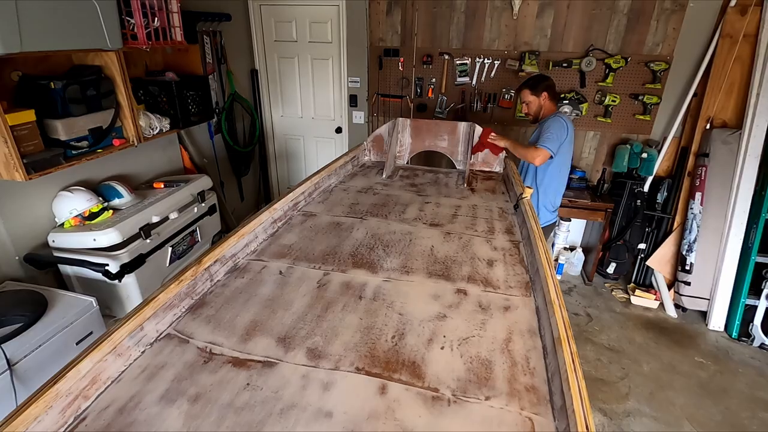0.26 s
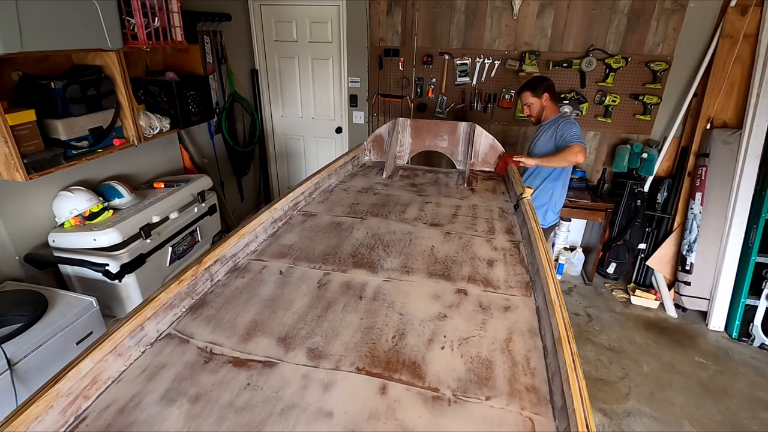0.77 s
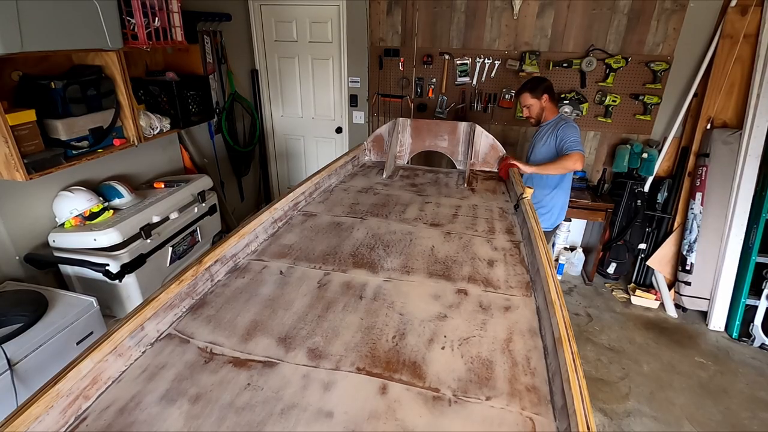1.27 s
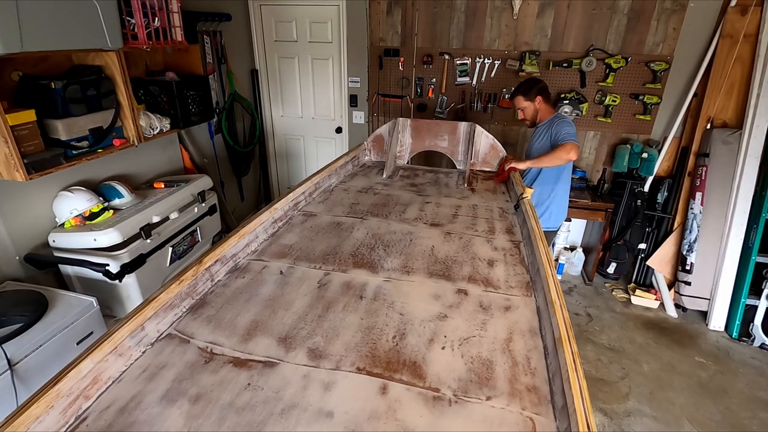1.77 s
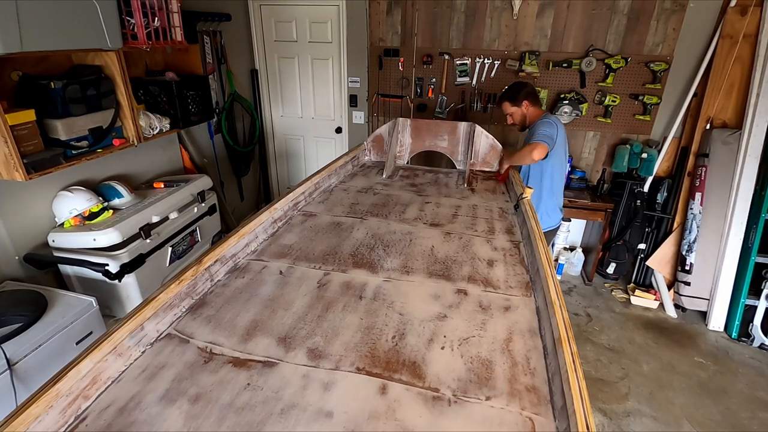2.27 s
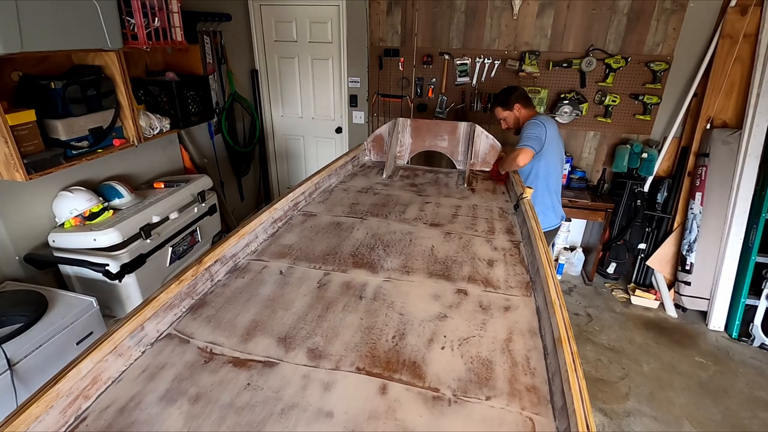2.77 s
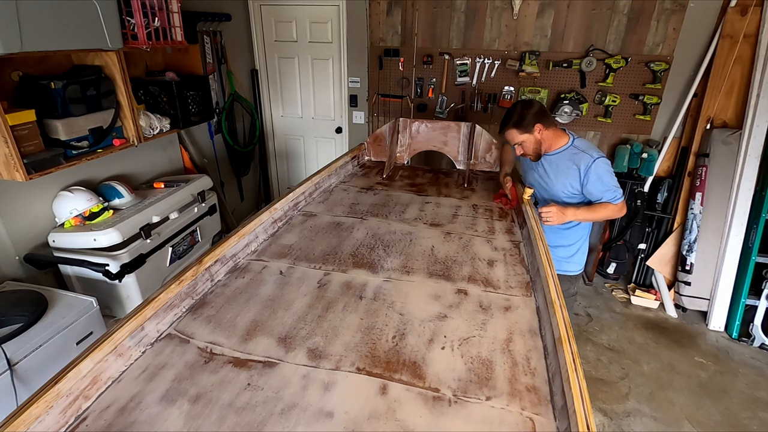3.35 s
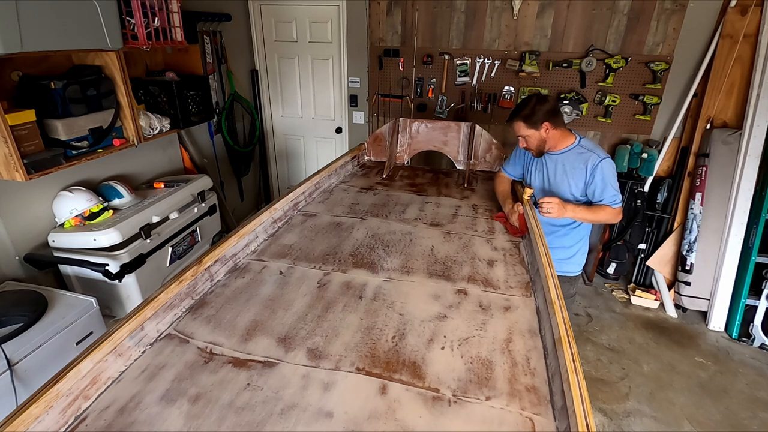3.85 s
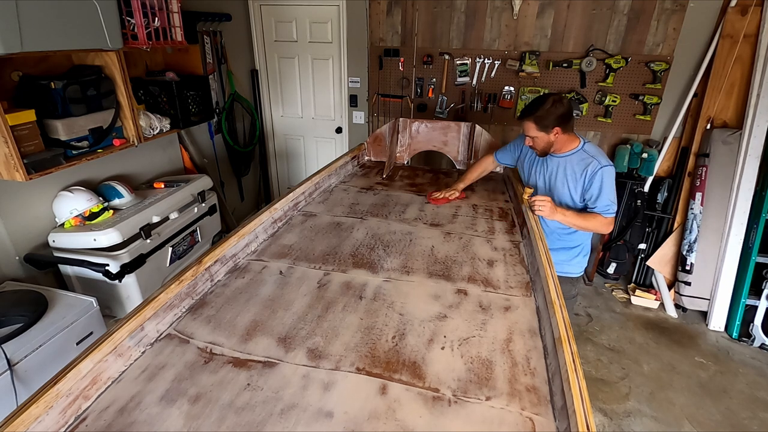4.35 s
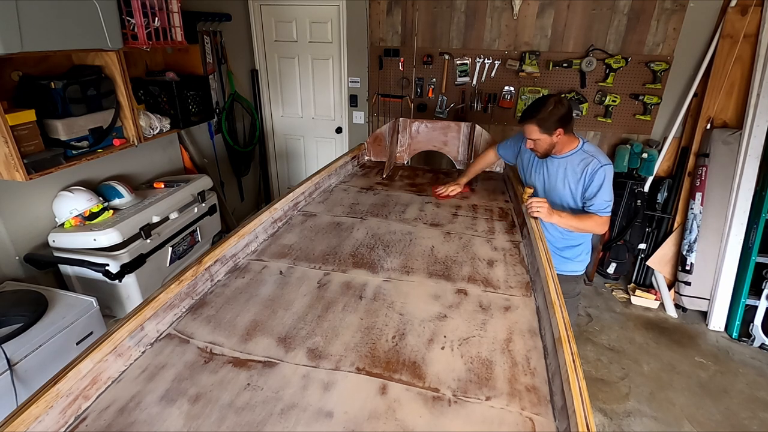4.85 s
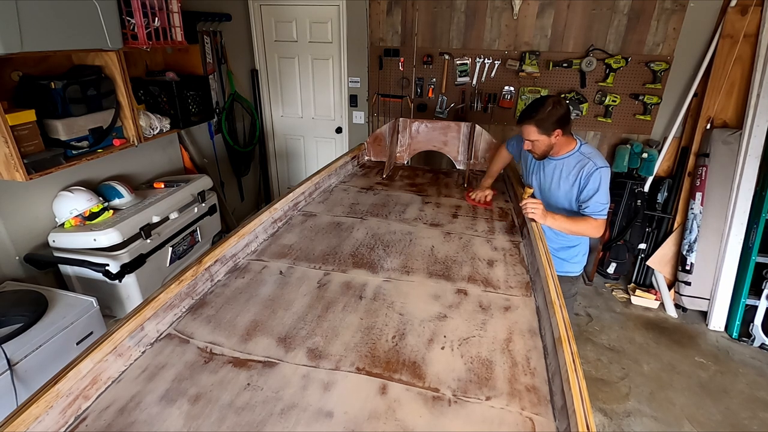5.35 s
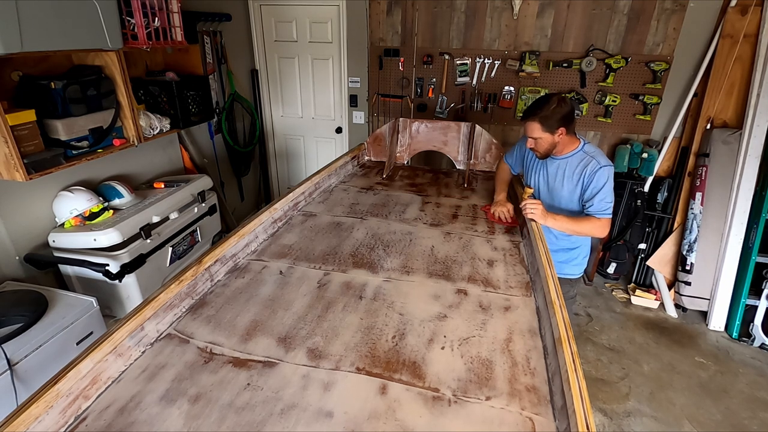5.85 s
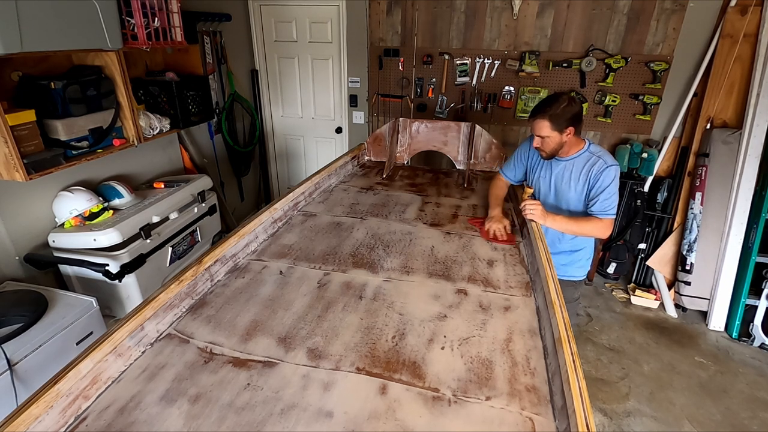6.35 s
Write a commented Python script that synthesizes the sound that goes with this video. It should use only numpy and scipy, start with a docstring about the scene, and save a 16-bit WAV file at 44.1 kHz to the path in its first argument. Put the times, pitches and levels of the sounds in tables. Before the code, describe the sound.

Soft, hissing rag strokes on wood with a few dull knocks, as a low hum abruptly gives way to a faint fan.

```python
"""A cloth rag scrubs a sanded wooden boat hull, close to the microphone in a cluttered garage.
Short strokes on the end board, two hard ones along the side, then long wipes over the bottom panel.
Fibres hiss as they slip on the grain and the boards murmur, amid dull knocks; early on, a draught
buffets the microphone. At three seconds the sound cuts abruptly: a deep machine hum and the end-board
strokes give way to the weaker drone of a fan and the side strokes."""
import sys
import numpy as np
from scipy import signal
from scipy.fft import rfft, irfft, next_fast_len
from scipy.io import wavfile
from scipy.ndimage import uniform_filter1d, map_coordinates

SR = 44100
rng = np.random.default_rng(int(sys.argv[2]) if len(sys.argv) > 2 else 0)


def digitize_waveform(pressure):
    """Quantize a signal to 16-bit integers and store it at the path in sys.argv[1].

    Rows of a 2-D input are taken as channels; values are limited to [-1, 1].
    """
    field = np.atleast_2d(pressure).T
    bounded = np.clip(field, -1, 1)
    quanta = np.round(bounded * 32767).astype(np.int16)
    wavfile.write(sys.argv[1], SR, quanta)


N = 291942

# Resonances of the hull boards: f/Hz, width/Hz, relative level/dB
WOOD_MODES = [(226, 59, 0), (357, 64, -1.5), (508, 99, 0), (857, 120, -2.5), (1034, 98, -2),
              (1520, 490, -8)]
CUT_S = 3.052  # the sound cuts abruptly from hum and end board to fan and side strokes
TURN_S = 0.033  # the rag rolls over this long at each turn
UNEVEN_DB, UNEVEN_PER_S = 0.76, 15  # the hand never presses quite evenly


def amp(db):
    """Decibels to gain."""
    return 10 ** (np.asarray(db) / 20)


def unit(x):
    """Scale to rms 1."""
    return x / np.sqrt(np.mean(x ** 2) + 1e-20)


def clock():
    """The time of each sample in seconds."""
    return np.arange(N) / SR


def during(start, end, fade_s=0.012):
    """1 between two times, with short fades outside them."""
    return np.clip(np.minimum(clock() - start, end - clock()) / fade_s + 1, 0, 1)


def wobble(rate):
    """A smooth random curve, rate knots a second."""
    coarse = np.arange(0, N / SR + .01, .001)
    knots = rng.standard_normal(int(N * rate / SR) + 4)
    return np.interp(clock(), coarse, map_coordinates(knots, [coarse * rate]))


def filtered(x, response):
    """x through a filter whose gain is response(Hz)."""
    size = next_fast_len(N + SR // 2)
    return irfft(rfft(x, size) * response(np.fft.rfftfreq(size, 1 / SR)), size)[:N]


def coloured(x, spectrum):
    """x shaped by points of f/Hz, level/dB, then scaled to rms 1."""
    f, db = np.transpose(spectrum)
    return unit(filtered(x, lambda hz: amp(np.interp(np.log(hz + 1), np.log(f), db))))


def band(centre_hz, width_hz):
    """A noise band of rms 1 around a centre that may move."""
    def lowpass(f):
        return 1 / (1 + (2 * f / width_hz) ** 2)
    real, imag = (filtered(rng.standard_normal(N), lowpass) for _ in range(2))
    phase = 2 * np.pi * np.cumsum(centre_hz) / SR
    return unit(real * np.cos(phase) + imag * np.sin(phase))


def stroke(start, length, db, easing_db, turn_s, speed_up_s=0.096, slow_down_s=0.084):
    """Gain of one stroke: the hand speeds up, eases off (or bears down), and slows into the turn."""
    age = clock() - start
    speed = np.clip(np.minimum((age + turn_s) / speed_up_s, (length - age + turn_s) / slow_down_s), 0, 1)
    along = np.clip(age / length, 0, 1)
    return speed * amp(db - easing_db * (along - .5))


def together_db(gains):
    """Level of strokes that overlap at the turns: their powers add."""
    return 10 * np.log10(sum(gain ** 2 for gain in gains) + 1e-9)


def friction(slips_per_s, clump_db, patchy_db):
    """Countless fibres slip on the grain, in clumps; the folds of the cloth keep shifting the colour."""
    slips = rng.standard_normal(N) * np.sqrt(rng.poisson(slips_per_s / SR, N))
    spectra = signal.stft(slips * amp(clump_db * wobble(140)), nperseg=512)[2]
    folds = uniform_filter1d(rng.standard_normal(spectra.shape), size=5, axis=0)  # smooth in frequency
    folds = uniform_filter1d(folds, size=14, axis=1)  # and in time
    return signal.istft(spectra * amp(patchy_db * unit(folds)), nperseg=512)[1][:N]


def stroke_hiss(slips, spectrum, level_db, usual_db, brighten):
    """Hiss on a level curve; the faster the stroke, the more of it lies in the top octave."""
    hiss = coloured(slips, spectrum)
    top = filtered(hiss, lambda f: 1 - 1 / (1 + (f / 9000) ** 4))
    return amp(level_db) * (hiss - top + top * amp(brighten * (level_db - usual_db)))


def boards(rubbing):
    """Rubbing heard through the resonances of the wood, which alternate in polarity."""
    def response(f):
        return sum((-1) ** k * amp(db) * 1j * f * width / (hz * hz - f * f + 1j * f * width)
                   for k, (hz, width, db) in enumerate(WOOD_MODES))
    return filtered(rubbing, response)


def end_board():
    """Short to-and-fro strokes: the hiss dies at each turn, and pressure makes the wood murmur."""
    # Strokes: t/s, length/s, hiss level/dB, wood level/dB, easing over the stroke/dB
    strokes = [(-.1, 0.25, -51, -51.5, 0.5), (0.192, .64, -55, -57, 14.5), (0.873, 0.16, -60.5, -65, -4),
               (1.145, 0.2, -59, -63, 4), (1.374, 0.19, -55, -59.5, 1), (1.647, 0.21, -54.5, -62, -1),
               (1.894, 0.24, -54, -58, 2), (2.18, 0.28, -50.8, -53, 2), (2.501, .26, -53, -53.5, 6.5),
               (2.791, .4, -48, -50, -6.5)]
    # Colour of the rag on the end board: f/Hz, relative level/dB
    colour = [(300, -14), (1200, -3.5), (2500, -2), (4000, -2), (6500, -1), (9500, -0.5), (11000, -5.5),
              (15800, -6)]
    hiss_db = together_db(stroke(s, length, db, ease, TURN_S) for s, length, db, _, ease in strokes)
    wood_db = together_db(stroke(s, length, db, ease, turn_s=.038) for s, length, _, db, ease in strokes)
    slips = friction(slips_per_s=80000, clump_db=0.2, patchy_db=1.04)
    hiss_db += UNEVEN_DB * wobble(UNEVEN_PER_S)
    hiss = stroke_hiss(slips, colour, hiss_db, usual_db=-60, brighten=0.08)
    rubbing = friction(slips_per_s=8000, clump_db=-0.2, patchy_db=2.6)
    murmur = amp(wood_db) * unit(boards(rubbing))
    return (hiss + murmur) * during(0, CUT_S)


def machine_tones(lines, waver_db, drift_rad):
    """The tones of a running machine, each a little unsteady in level and phase."""
    out = np.zeros(N)
    for hz, db in lines:
        peak = np.sqrt(2) * amp(db + waver_db * wobble(7))
        phase = 2 * np.pi * (hz * clock() + rng.random()) + drift_rad * wobble(4)
        out += peak * np.sin(phase)
    return out


def deep_hum(whir_start_hz=107, climb_hz_per_s=8.2, fade_db_per_s=1.5):
    """A machine's hum, heard up to the cut; a faint whir climbs and fades as a motor gathers speed."""
    # Tones of the hum: f/Hz, rms level/dB
    lines = [(30, -27), (56, -53), (60, -58), (90, -61), (240, -70)]
    whir_hz = whir_start_hz + climb_hz_per_s * clock()
    whir_db = -54 - fade_db_per_s * clock() + 0.73 * wobble(4.3)
    whir = amp(whir_db) * np.sin(2 * np.pi * np.cumsum(whir_hz) / SR)
    hum = machine_tones(lines, waver_db=0.5, drift_rad=0.022)
    return (hum + whir) * during(0.0098, CUT_S - .01)


def room_tone():
    """The steady air of the garage, mostly low rumble."""
    # Colour of the air: f/Hz, relative level/dB
    colour = [(10, 19), (25, 8.5), (55, 10), (75, -0.5), (115, 2), (160, -8.5), (250, -8), (520, -10),
              (750, -16.5), (2000, -16.5), (3000, -24.5), (8000, -31), (15800, -40)]
    return amp(-44.5) * coloured(rng.standard_normal(N), colour)


def draught(gust_s=0.693, gust_width_s=0.06, eddy_width_s=0.51):
    """A faint steady draught flutters on the microphone, with one gust amid weaker eddies."""
    # Colour of wind on the microphone: f/Hz, relative level/dB
    colour = [(4, -24), (8, 4), (12, -2), (20, -18.5), (35, -27), (55, -17.5), (90, -42.5), (150, -51.5),
              (800, -85)]
    since = clock() - gust_s
    gust = amp(-16) * np.exp(-.5 * (since / gust_width_s) ** 2)
    eddies = amp(-32) * np.exp(-.5 * (since / eddy_width_s - .5) ** 2)
    return (gust + eddies + amp(-48)) * coloured(rng.standard_normal(N), colour)


def drags(sharpness=3.9):
    """Sticking cloth feeds a resonance that swells and shifts as the hand travels."""
    # Where the rag drags: t/s, length/s, level/dB, starting f/Hz, final f/Hz
    swells = [(0.26, 0.3, -52.5, 531, 553), (0.287, 0.11, -55.5, 1504, 1352), (2.23, 0.11, -54, 960, 950),
              (2.32, .11, -53.5, 643, 499), (3.22, .13, -56, 956, 985), (4.602, .14, -53, 6460, 6330),
              (4.87, 0.27, -56, 4910, 5050), (6.108, 0.13, -52, 4650, 4800)]
    out = np.zeros(N)
    for start, length, db, start_hz, end_hz in swells:
        along = np.clip((clock() - start) / length, 0, 1)
        swell = np.sqrt(4 * along * (1 - along))
        out += amp(db) * swell * band(start_hz + (end_hz - start_hz) * along, start_hz / sharpness)
    return out


def knocks(attack_s=0.0057, sharpness=4):
    """Dull knocks and thumps, each a dying band of noise; one thump falls where the hum cuts off."""
    # Knocks and thumps: t/s, level the decay starts from/dB, centre f/Hz, t60/s
    thumps = [(.305, -45, 298, 0.17), (.63, -51, 306, 0.23), (0.989, -47, 266, 0.13),
              (.996, -48.5, 523, .18), (1.175, -48, 577, 0.13), (1.185, -44, 335, 0.15),
              (1.456, -50, 2900, .13), (1.535, -47, 437, .17), (2.232, -40.5, 920, 0.14),
              (2.645, -45, 255, 0.31), (2.66, -38.5, 101.5, 0.59), (3.044, -38, 274, .065),
              (3.05, -39, 107, 0.44)]
    out = np.zeros(N)
    for start, db, hz, t60 in thumps:
        age = np.maximum(clock() - start, 0)
        envelope = amp(db - 60 * age / t60) * (1 - np.exp(-age / attack_s))
        noise = rng.standard_normal(N)
        ring = filtered(noise, lambda f: 1 / (1 + (sharpness * np.log2((f + 1) / hz)) ** 2))
        out += envelope * unit(ring)
    return out


def fan(until_s=6.53):
    """A fan drones in the background from the cut onwards."""
    # Tones of the fan: f/Hz, rms level/dB
    lines = [(35.5, -52), (86.8, -52), (104.5, -56.5), (119, -71), (208.5, -65), (240, -67), (316, -69),
             (420, -73)]
    return machine_tones(lines, waver_db=1.5, drift_rad=0.48) * during(CUT_S, until_s)


def hull_side():
    """Two firm strokes hiss along the side of the hull."""
    # Strokes: t/s, length/s, hiss level/dB, easing over the stroke/dB
    strokes = [(3.085, 0.31, -44.5, -1), (3.418, 0.34, -45, 2)]
    # Colour of the rag on the side: f/Hz, relative level/dB
    colour = [(300, -4), (700, -3.5), (1000, -0.5), (1400, -2), (2100, 0.5), (3500, -1), (5500, -1),
              (9500, 0), (11000, -7), (15800, -3.5)]
    hiss_db = together_db(stroke(*row, TURN_S) for row in strokes)
    hiss = coloured(friction(slips_per_s=40000, clump_db=0.5, patchy_db=1.1), colour)
    return amp(hiss_db) * hiss * during(CUT_S, 3.78)


def bottom_panel(full_reach_s=4.42, circle_s=0.585, reach_db=0.17):
    """The rag circles on the murmuring panel; as the arm reaches, the hiss swells and a swish sinks."""
    # Effort of the long wipes: t/s, hiss level/dB
    effort = [(3.79, -55), (3.84, -51), (4.03, -49.5), (4.27, -46.5), (5.05, -45), (6.05, -46),
              (6.62, -45.3)]
    # Colour of the rag on the panel: f/Hz, relative level/dB
    colour = [(300, -22), (800, -9.5), (1600, -4), (3200, -4), (4700, 0), (7500, -0.5), (9500, -0.5),
              (11000, -6), (15800, -5.5)]
    effort_db = np.interp(clock(), *np.transpose(effort))
    reach = np.cos(2 * np.pi * (clock() - full_reach_s) / circle_s)
    hiss_db = effort_db + reach_db * reach + UNEVEN_DB * wobble(UNEVEN_PER_S)
    slips = friction(slips_per_s=80000, clump_db=0.6, patchy_db=1)
    hiss = stroke_hiss(slips, colour, hiss_db, usual_db=-50, brighten=0.61)
    swish = amp(hiss_db - 11.5) * band(centre_hz=5814 - 551 * reach, width_hz=2600)
    panel_hz = np.full(N, WOOD_MODES[2][0])
    murmur = amp(hiss_db - 22.5 + 3.2 * wobble(8)) * band(panel_hz, width_hz=130)
    return (hiss + swish + murmur) * during(3.79, N / SR)


def garage(x, tail_db, wall_db):
    """Nearby walls and the hull itself throw back quick copies; the cluttered room adds a short tail."""
    # Reverberation of the garage: f/Hz, t60/s
    decay = [(100, 0.18), (1000, 0.47), (5000, 0.12), (15000, 0.082)]
    hz, t, spectra = signal.stft(rng.standard_normal(SR // 3), SR, nperseg=256)
    t60 = np.interp(hz, *np.transpose(decay))
    tail = signal.istft(spectra * amp(-60 * t / t60[:, None]), SR, nperseg=256)[1]
    response = amp(tail_db) * tail / np.linalg.norm(tail)
    delays_s = rng.uniform(.002, .016, size=6)
    response[(delays_s * SR).astype(int)] += amp(wall_db) * rng.choice([-1, 1], size=6)
    response[0] += 1  # the direct path to the microphone
    return signal.fftconvolve(x, response / np.linalg.norm(response))[:N]


def scene():
    """The rag on the hull, over the sounds of the garage, at one microphone."""
    rag = garage(end_board() + hull_side() + bottom_panel(), tail_db=-19.0, wall_db=-19.5)
    return (rag + knocks() + drags() + deep_hum() + fan() + room_tone() + draught())[None]


def record(dry, top_hz=15850):
    """The camera's microphone channel passes nothing above its band limit."""
    return np.array([filtered(channel, lambda hz: hz < top_hz) for channel in dry])


dry = scene()
out = record(dry)
digitize_waveform(out)
```